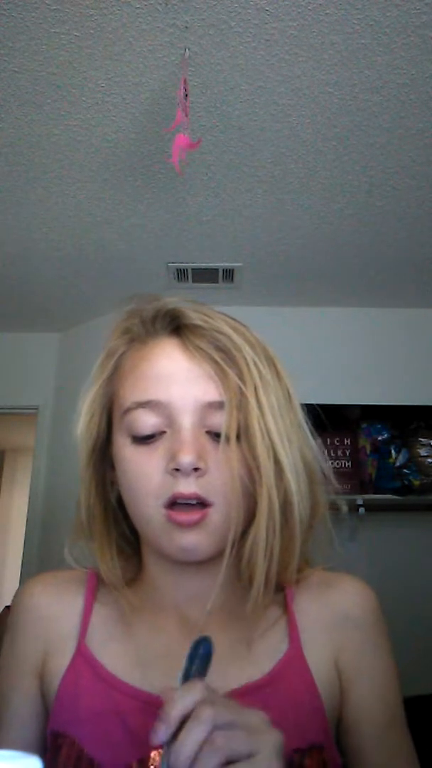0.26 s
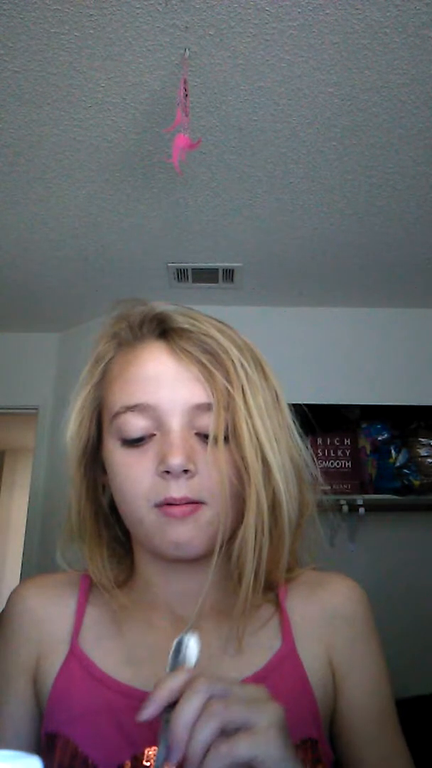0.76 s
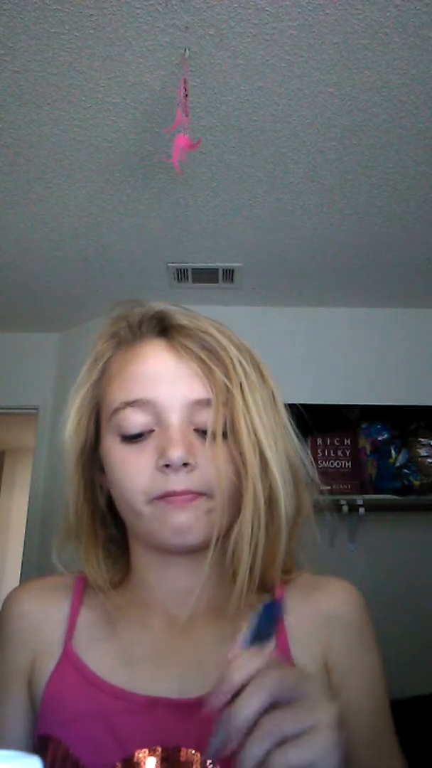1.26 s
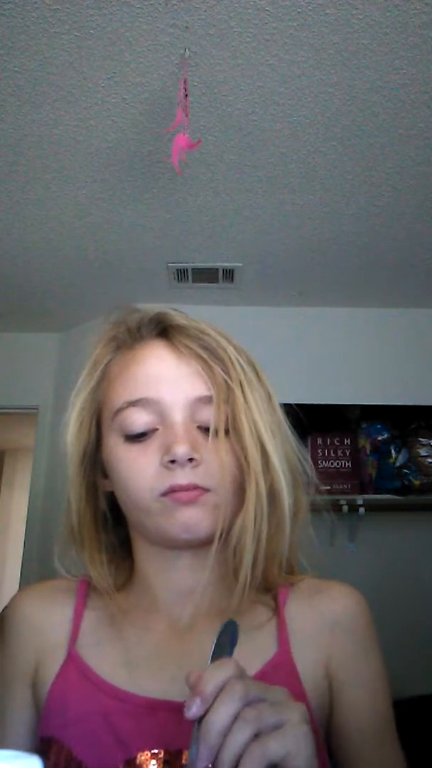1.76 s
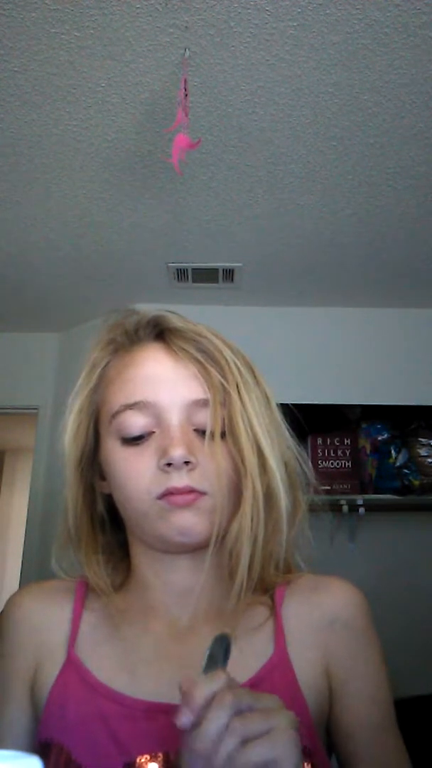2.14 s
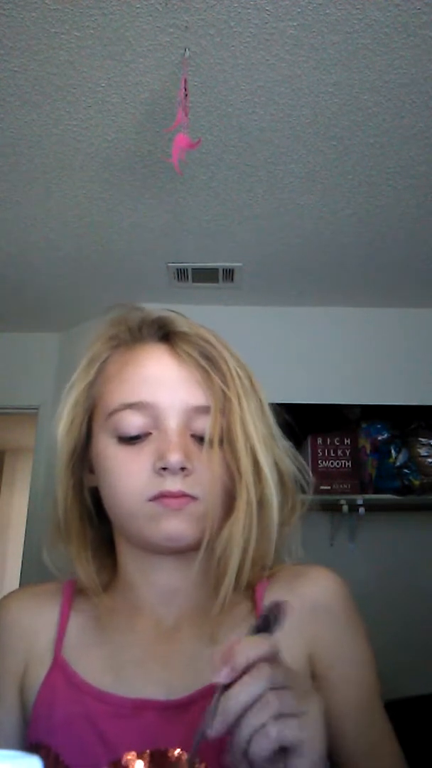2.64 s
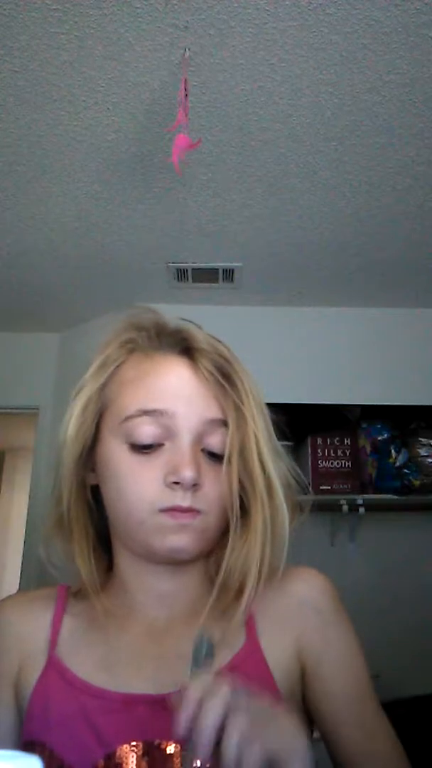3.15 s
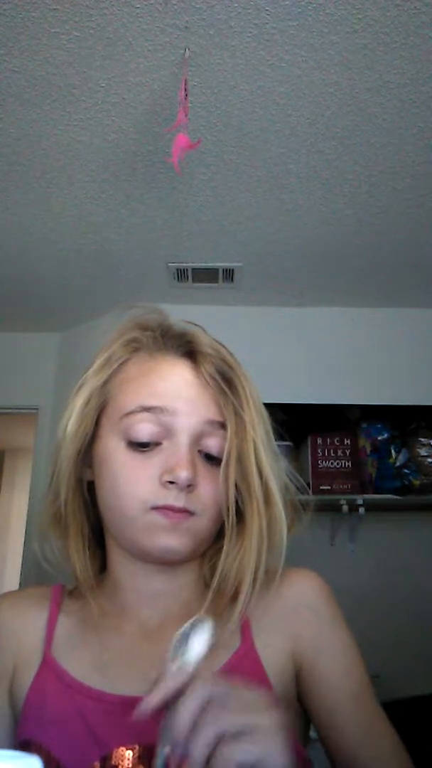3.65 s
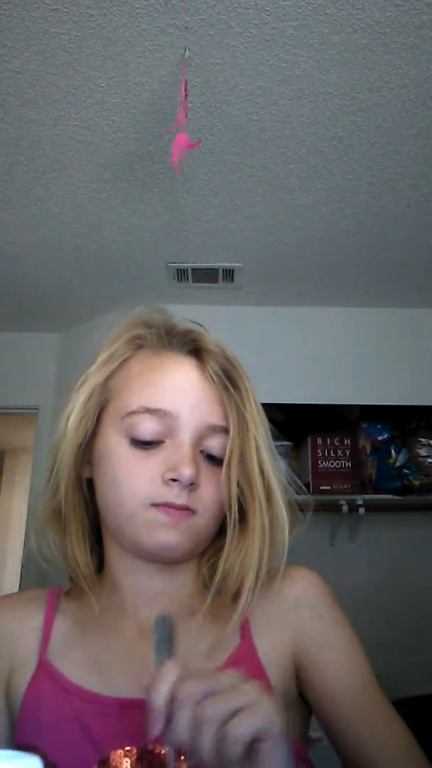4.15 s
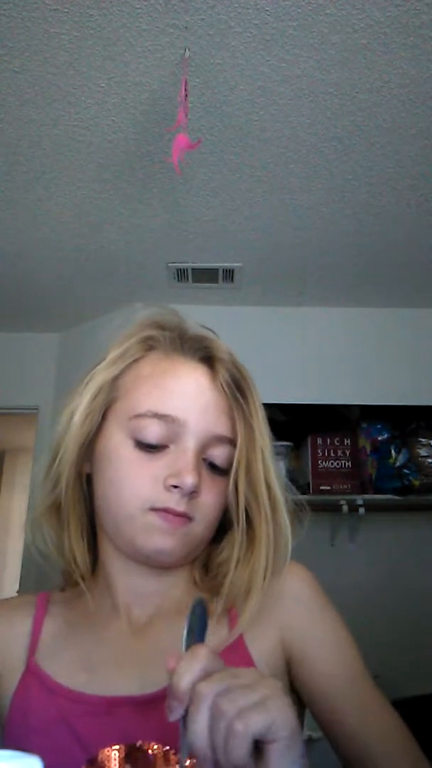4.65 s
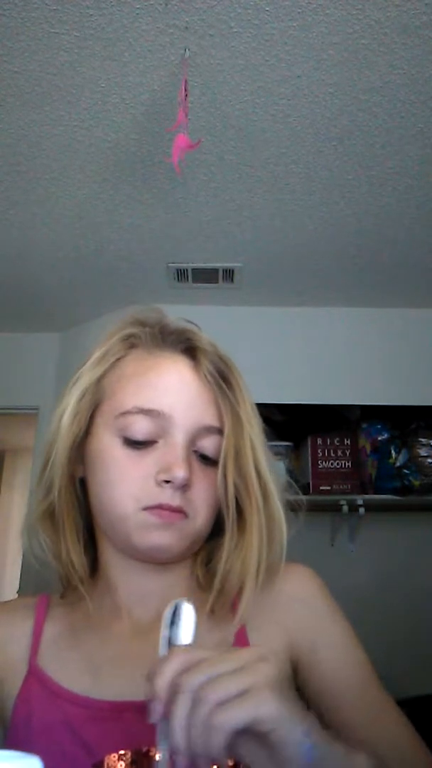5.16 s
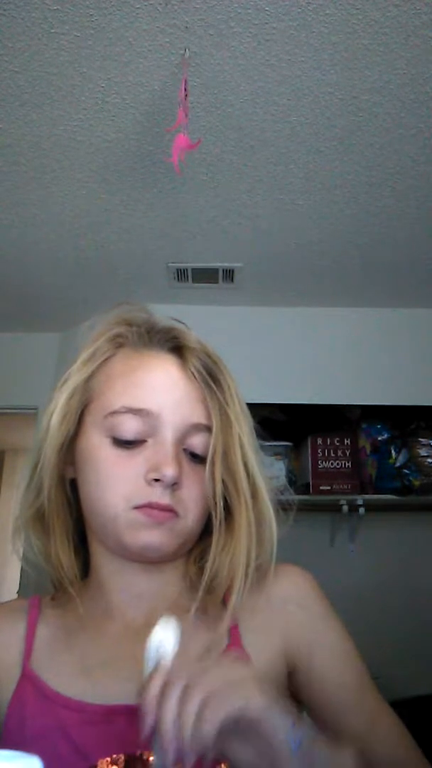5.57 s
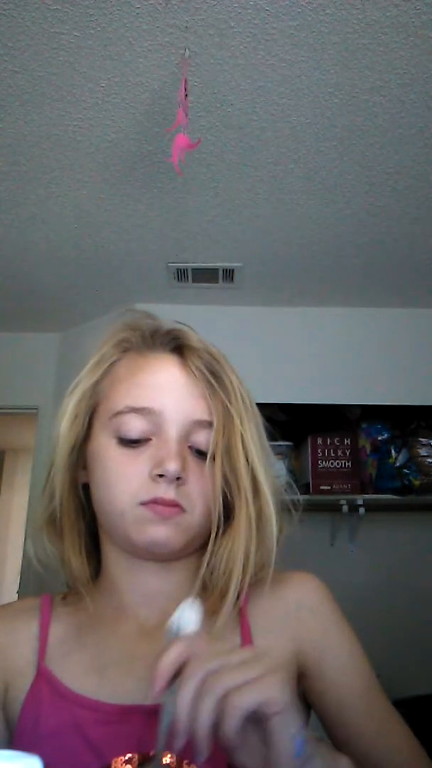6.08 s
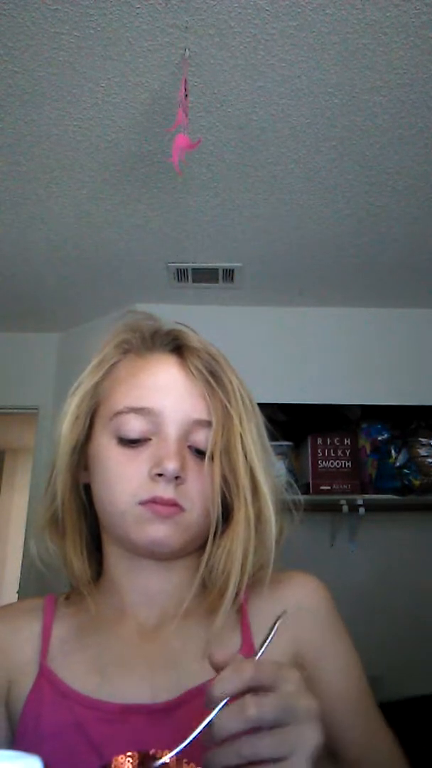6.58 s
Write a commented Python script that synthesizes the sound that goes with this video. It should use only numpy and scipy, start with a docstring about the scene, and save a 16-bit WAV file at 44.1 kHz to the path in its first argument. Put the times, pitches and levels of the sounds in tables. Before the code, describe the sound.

Irregular spoon taps on a slime-damped plastic cup: dull, woody mid-pitched tocks with a bright metallic tick on top, dying almost at once. Early taps are spaced, then busier and harder, followed by a softer passage of sticky, gritty dragging and a loud closing burst of knocks. Close stereo microphone with the cup nearer the left; the right is duller. Faint airy hiss and low hum of a small room.

```python
"""A metal spoon stirs sticky slime in a small plastic cup on a table, close to the left port of a two-port microphone.
Knocks on the cup are sums of fading tones plus a bright crack of shaped noise, with a short rough rattle after.
Dragging is grainy noise that swells with each stroke, with small popping tones; a few thin squeaks are pure tones.
Soft low bumps, many just after a knock, are short swelling tones. A small quiet room adds echoes,
and noise makes its air and faint hums."""
import sys
import numpy as np
from scipy import signal
from scipy.fft import rfft, irfft, next_fast_len
from scipy.io import wavfile
from scipy.ndimage import uniform_filter1d

SR = 44100
rng = np.random.default_rng(int(sys.argv[2]) if len(sys.argv) > 2 else 0)


def master_out(mix):
    """Clip the mix to full scale and print it as 16-bit PCM to the path in sys.argv[1]."""
    frames = np.transpose(np.atleast_2d(mix))
    ceiling = np.clip(frames, -1, 1)
    pcm = np.round(ceiling * 32767).astype(np.int16)
    wavfile.write(sys.argv[1], SR, pcm)


N = 300321  # length in samples

# All levels are those in the mix, before the overload in record().
# Still room air. Each row: pitch in Hz, relative level per hertz in dB.
AIR_SPECTRUM = [(15, -21), (30, -31), (60, -15.5), (110, -9), (200, -12.5), (300, -16), (600, -21.5),
                (1000, -23), (1400, -23), (2500, -23.5), (5000, -29.5), (9000, -30), (15600, -33.5),
                (16100, -47.5)]
# How alike the air is at both ports. Each row: pitch in Hz, likeness (1 is the same).
AIR_LIKENESS = [(60, 0.9), (240, 0.76), (950, -0.05), (3770, 0.014), (15000, 0.023)]
# How the air leans to one side. Each row: pitch in Hz, left minus right in dB.
AIR_BALANCE = [(60, -11.5), (180, -1.5), (550, -1.5), (1650, 6), (4970, 7), (15000, 5.5)]
# Wavering hums. Each row: pitch in Hz, width in Hz, level in dB.
ROOM_HUMS = [(38.3, 5, -73.5), (115.9, 15, -67)]
# Strokes through the slime. Each row: time of most pressure in seconds, rise in seconds, fall in seconds,
# rub level in dB, hiss level in dB, level of the rub's low body in dB.
SPOON_STROKES = [(.78, .04, 0.28, -66, -71, -66), (1.12, 0.072, .14, -55, -67, -47.5),
                 (1.353, 0.1, 0.06, -63.5, -65.5, -61), (1.64, 0.051, 0.054, -75, -62.5, -66),
                 (1.838, 0.021, 0.022, -69, -66, -66), (2.17, 0.046, 0.088, -78, -74, -71),
                 (2.39, 0.076, 0.07, -62, -78, -66), (2.5, 0.12, 0.017, -57, -51, -62),
                 (2.6, 0.073, 0.04, -75, -82, -68), (2.92, 0.098, 0.15, -58, -61.5, -58),
                 (3.062, 0.025, 0.029, -60, -65, -68), (3.19, 0.07, 0.069, -58.5, -55.5, -62),
                 (3.4, 0.063, 0.036, -65, -57.5, -63.5), (3.5, .05, 0.039, -58, -57.5, -62),
                 (3.934, 0.074, 0.056, -60.5, -65, -58.5), (4.16, 0.027, 0.14, -68, -65.5, -69),
                 (4.318, 0.078, 0.091, -56, -68.5, -52), (4.653, 0.091, 0.083, -53, -57.5, -59),
                 (4.97, .05, .05, -76.5, -81, -59.5), (5.15, 0.14, 0.17, -63.5, -66, -72),
                 (5.288, 0.031, 0.01, -67, -53, -71), (5.385, 0.05, 0.034, -51.5, -53, -53),
                 (5.601, 0.082, 0.075, -59, -58, -68), (5.73, 0.13, 0.066, -55.5, -68, -56),
                 (5.85, 0.065, 0.058, -59.5, -60, -73), (5.92, 0.067, 0.086, -54, -66, -59),
                 (6.04, 0.054, 0.041, -55.5, -69, -56), (6.42, 0.063, 0.075, -66, -87, -63),
                 (6.65, 0.075, .04, -59, -60, -64), (6.7, 0.036, .04, -56, -59, -56)]
# Colour of the rubbing. Each row: pitch in Hz, relative level per hertz in dB.
RUB_SPECTRUM = [(120, 1), (280, 1), (520, 0), (900, -4), (1350, 3), (1800, -1), (2300, -4), (2700, -5.5),
                (3100, -4), (4000, -9), (5000, -12.5), (7000, -20.5), (12000, -42)]
# Colour of the hiss. Each row: pitch in Hz, relative level per hertz in dB.
HISS_SPECTRUM = [(3000, -32.5), (6000, -10.5), (7500, -13), (9500, -3.5), (11000, -8.5), (13000, -17.5),
                 (15500, -20.5), (16200, -35)]
# Spoon knocks. Each row: start in seconds, peak level in dB of wall ring, table thud, bottom ring, rim clack
# and metallic crack, pitch in Hz that the struck spot favours in the wall, length factor of wall and bottom ring.
SPOON_KNOCKS = [(0.2243, -11.5, -20, -25.5, -17.5, -29, 1340, 0.78),
                (0.547, -19.5, -23.5, -34.5, -19, -17.5, 1560, 1),
                (0.763, -53, -51, -49.5, -44, -48, 930, 0.86), (1.0678, -39, -52, -52, -57, -53, 1600, 0.7),
                (1.2736, -37, -44, -51, -35.5, -58, 1410, 0.9),
                (1.348, -44, -57, -47, -61, -58, 1560, 0.67),
                (1.506, -4.5, -16.5, -19, -12.5, -17.5, 1340, 0.72),
                (1.5771, -28, -30, -37.5, -27, -32.5, 1560, 0.9),
                (1.7084, -21, -33.5, -36.5, -23.5, -29.5, 1490, 0.69),
                (1.959, -23.5, -33.5, -33.5, -26.5, -32, 1560, 0.39),
                (2.0147, -53, -69, -58, -48, -37, 1570, 0.98),
                (2.039, -21.5, -23.5, -22.5, -25.5, -26.5, 1780, 0.57),
                (2.095, -23.5, -36.5, -38.5, -29.5, -43, 1340, 0.71),
                (2.2502, -6, -41, -15.5, -10, -15.5, 1226, 0.47),
                (2.431, -61, -65, -65, -44, -41, 995, 0.96),
                (2.453, -14, -29.5, -26, -26.5, -35.5, 1390, 0.32),
                (2.6638, -18, -26, -27.5, -19, -25, 1230, 0.33),
                (2.707, -39, -70, -61, -57, -51, 1790, 0.7),
                (2.769, -19.5, -29.5, -30, -16, -22.5, 1350, 0.9),
                (2.7783, -4, -16, -20, -9.5, -8.5, 1390, 0.72),
                (2.949, -34, -32.5, -40, -59, -59, 1116, 0.66),
                (3.005, -27.5, -32.5, -34, -32, -38.5, 1540, 0.73),
                (3.1168, -24.5, -35, -36, -25.5, -36, 1360, 0.37),
                (3.183, -28, -27.5, -39, -44, -52, 1240, 0.59),
                (3.24, -63, -39.5, -54, -54, -53, 1810, 0.9), (3.41, -43, -52, -46, -49.5, -49, 1360, 0.83),
                (3.4224, -28.5, -33, -34, -33, -35.5, 1410, 0.95),
                (3.4425, -25, -23, -33, -23, -22.5, 1310, 1),
                (3.6438, -7.5, -23.5, -38, -8, -17.5, 1550, 0.8),
                (3.7453, -9.5, -14, -11.5, -11.5, -10, 1290, 0.75),
                (3.843, -23.5, -46, -41, -29, -35, 1560, 0.53), (3.8653, -43, -40, -44, -50, -42, 1310, 1),
                (4.0234, -14.5, -26, -40, -16, -12.5, 1360, 0.81),
                (4.1546, -47.5, -50, -58, -50.5, -44, 1730, 0.88),
                (4.307, -45, -40.5, -48.5, -65, -58.5, 1800, 1),
                (4.419, -53.5, -60, -66, -60, -46.5, 1270, 0.9),
                (4.5326, -38, -42, -48, -47, -50, 1260, 0.36),
                (4.661, -24.5, -31, -36, -31, -32, 1350, 0.38),
                (5.048, -46.5, -49, -52, -52, -48, 1560, 0.67), (5.107, -42, -63, -66, -41.5, -42, 1560, 1),
                (5.238, -51, -63, -66.5, -49.5, -40, 1350, 0.82),
                (5.513, -37, -34, -40.5, -60.5, -59, 1200, 0.61),
                (5.518, -33, -35.5, -57, -27.5, -27, 1800, 1),
                (5.65, -66, -57, -49, -39, -33.5, 1560, 0.35),
                (5.669, -28.5, -27, -31, -38.5, -53, 1330, 0.74),
                (5.796, -42.5, -73, -62, -50, -42, 1310, 1), (5.9019, -41, -53, -50, -42, -35.5, 1340, 1),
                (6.0046, -57, -69, -55, -35, -39.5, 1310, 0.9),
                (6.078, -42, -31, -36, -31, -45, 1500, 0.45),
                (6.083, -8, -23.5, -20, -13.5, -26.5, 1705, 0.57),
                (6.2057, -2.5, -15.5, -5.5, -10.5, -13.5, 1126, 0.25),
                (6.303, -16, -31, -33, -20, -29.5, 1240, 0.41),
                (6.3529, -12, -30.5, -36, -18, -17, 1474, 0.7),
                (6.5733, -11, -26, -31, -9, -7.5, 1423, 0.97),
                (6.669, -14.5, -27, -35, -18, -21, 1550, 0.81),
                (6.7378, -13.5, -15.5, -46, -17.5, -27, 1180, 0.39)]
# Each blow shifts pitches and levels in the next four tables; it scales times only for wall and bottom,
# while table and rim times have a fixed factor.
# Tones of the cup wall, damped by slime. Each row: pitch in Hz, level in dB, time to fall 60 dB in seconds.
WALL_TONES = [(1110, -6.5, 0.089), (1180, -28.5, 0.01), (1290, -11.5, 0.066), (1360, 13.5, 0.02),
              (1516, 10, 0.013), (1560, 0, 0.0088), (1552, 7, 0.02), (1737, 3.5, 0.022)]
# Tones of the table under the cup. Each row: pitch in Hz, level in dB, time to fall 60 dB in seconds.
TABLE_TONES = [(159, -6, 0.061), (253, -6.5, 0.17), (344, 5, 0.043), (394.4, -3, 0.043), (486, -0.5, 0.06),
               (521.4, 0, 0.051)]
# Tones of the cup bottom under the slime. Each row: pitch in Hz, level in dB, time to fall 60 dB in seconds.
BOTTOM_TONES = [(582, -4, 0.058), (691, -3.5, 0.045), (769, -7, 0.052), (847, -1, 0.067), (945, 1, 0.035),
                (954, -5.5, 0.019)]
# Tones of the rim, heard as a short clack. Each row: pitch in Hz, level in dB, time to fall 60 dB in seconds.
RIM_TONES = [(1995, 8.5, 0.01), (2216, -9, 0.025), (2368, 5, 0.015), (2683, 11, 0.0071),
             (3087, 7.5, 0.0077), (3275, 3.5, 0.014), (3760, -17.5, 0.015), (4355, 1.5, 0.01),
             (4970, -38, 0.0027), (5770, -3, 0.0061)]
# Crack of metal on plastic. Each row: pitch in Hz, relative level per hertz in dB.
CRACK_SPECTRUM = [(2000, -15.5), (4500, 5), (7200, -1), (9300, 4.5), (11000, -1.5), (13000, -7),
                  (16500, -24)]
# Soft low bumps near 114 Hz, many just after a knock.
# Each row: time of the peak in seconds, level in dB, half length in seconds.
LOW_THUMPS = [(0.239, -43.5, 0.0083), (1.537, -36.5, 0.013), (1.604, -42, 0.0049), (2.058, -45, 0.01),
              (2.802, -36.5, 0.0088), (3.205, -48.5, 0.011), (3.258, -40, 0.0083), (3.448, -35, 0.008),
              (3.471, -33.5, 0.0072), (3.764, -34, 0.0087), (4.688, -41, 0.0041), (5.074, -43, 0.0122),
              (5.538, -47.5, 0.0056), (5.7, -40, 0.008), (6.228, -36, 0.0068), (6.382, -45.5, 0.012),
              (6.765, -33, 0.0088)]
# Faint squeaks of spoon on wet plastic. Each row: start in seconds, peak in dB, pitch in Hz, length in seconds.
WET_SQUEAKS = [(.675, -58, 3820, 0.024), (0.742, -62, 3820, 0.019), (0.776, -62.5, 3220, 0.022),
               (4.183, -52.5, 2950, 0.018)]
# The far port is shaded from the cup. Each row: pitch in Hz, left minus right in dB.
PORT_SHADE = [(100, 5.5), (300, -1), (700, 4.5), (1400, 15), (3000, 17), (6000, 27), (10000, 34),
              (15000, 13)]
# The cup throws its treble upward, into the room. Each row: pitch in Hz, level in dB.
ROOM_SEND = [(100, -3.5), (500, 0), (1500, -2.5), (4000, -12), (10000, 5.5), (15000, -1.5), (16300, -12.5)]
# Echoes from walls and ceiling. Each row: delay in seconds, level in dB.
ROOM_ECHOES = [(.009, -20.5), (0.0158, -30), (0.016, -28.5)]
# How long the room's tail lasts. Each row: pitch in Hz, time to fall 60 dB in seconds.
ROOM_DECAY = [(125, 0.22), (500, 0.24), (1500, 0.24), (4000, 0.38), (10000, 0.17), (16000, 0.18)]

AIR_DB = -64
STROKE_ENDS_DB = -20.5  # level at the ends of rise and fall, against the peak
CREEP_RUB_DB, CREEP_HISS_DB = -75.5, -83.5  # the slime creeps on between strokes
BODY_HZ = 950  # under this pitch the rubbing is heard through cup bottom and table
POPS_DB, POPS_PER_S = -6, 90  # level against the rub, average count per second
TABLE_SPOT_HZ, RIM_SPOT_HZ = 428, 2715  # pitch favoured in table and rim
CRACK_T60_S = 0.009  # fading of the raw burst, too short to carry a pitch
BOUNCE_S, BOUNCE_DB = 0.002, -5  # the spoon's edge touches twice: typical gap, level of the second touch
RATTLE_DB, RATTLE_T60_S = -24.5, 0.14  # level against the wall ring, time to fall 60 dB
THUMP_HZ = 114  # middle of a small random range
LAG_S = 0.00041  # travel from near to far port
ROOM_DB, ROOM_LEAN = -8.5, 0.44  # tail level; share of the shading that the room sound feels
EDGE_HZ = 16700  # upper limit of the sound


def gain_of(db):
    """Turns decibels into amplitude."""
    return 10 ** (np.asarray(db) / 20)


def evened(x):
    """Scales a sound to an average (rms) level of 1."""
    return x / np.sqrt(np.mean(x ** 2) + 1e-20)


def read(points, hz):
    """Reads between the rows of a table, on a log pitch scale."""
    table_hz, value = np.transpose(points)
    return np.interp(np.log(hz + 1), np.log(table_hz + 1), value)


def add(mix, s, sound):
    """Mixes a sound in at time s, in seconds."""
    part = mix[round(s * SR):][:len(sound)]
    part += sound[:len(part)]


def coloured(x, response):
    """Filters a sound: each pitch is multiplied by response(pitch)."""
    size = next_fast_len(x.shape[-1])
    spectrum = rfft(x, size) * response(np.fft.rfftfreq(size, 1 / SR))
    return irfft(spectrum, size)[..., :x.shape[-1]]


def air():
    """Still room air is soft noise, partly alike at both ports; hums are narrow bands of noise."""
    left_noise, other_noise, hum_noise = rng.standard_normal((3, N))

    def likeness(hz):
        return np.clip(read(AIR_LIKENESS, hz), -1, 1)

    left = coloured(left_noise, lambda hz: gain_of(read(AIR_SPECTRUM, hz)))
    right = coloured(left_noise, likeness)
    right += coloured(other_noise, lambda hz: np.sqrt(1 - likeness(hz) ** 2))
    right = coloured(right, lambda hz: gain_of(read(AIR_SPECTRUM, hz) - read(AIR_BALANCE, hz)))
    hums = np.zeros(N)
    for hum_hz, width_hz, db in ROOM_HUMS:
        band = coloured(hum_noise, lambda hz: 1 / (1 + (2 * (hz - hum_hz) / width_hz) ** 2))
        hums += gain_of(db) * evened(band)
    return gain_of(AIR_DB) * evened(np.array([left, right])) + hums


def pressure(column, creep_db):
    """Loudness curve of one drag layer: each stroke swells and dies away, over a steady creep."""
    t, out = np.arange(N) / SR, np.full(N, gain_of(creep_db))
    for row in SPOON_STROKES:
        s, rise_s, fall_s = row[:3]
        near = slice(max(round((s - 0.5) * SR), 0), round((s + 0.5) * SR))
        late = t[near] - s
        distance = np.maximum(-late / rise_s, late / fall_s)  # 0 at the peak, 1 at the ends
        out[near] += gain_of(row[column] + STROKE_ENDS_DB * distance ** 0.88)
    return out


def patchy(x, patch_db, frames, bins):
    """Lifts and lowers random patches of time and pitch."""
    z = signal.stft(x, nperseg=256)[2]
    field = uniform_filter1d(rng.standard_normal(z.shape), bins, 0)
    field = uniform_filter1d(field, frames, 1)
    return evened(signal.istft(z * gain_of(patch_db * evened(field)), nperseg=256)[1][:N])


def slime_pops():
    """Where slime lets go, a small pop rings: a tone at one of 12 pitches that fades at once."""
    size = gain_of(0.47 * np.minimum(rng.exponential(1, N), 4))
    size = size * (rng.random(N) < POPS_PER_S / SR)  # most samples start no pop
    kind, t, pops = rng.integers(0, 12, N), np.arange(200) / SR, np.zeros(N)
    for k, hz in enumerate(np.geomspace(1300, 11000, 12)):
        pop = np.sin(2 * np.pi * hz * t) * np.exp(-hz * t / 1.7)
        pops += signal.oaconvolve(size * (kind == k), pop)[:N]
    return evened(pops)


def drag():
    """Stick and slip make grainy rubbing and hiss, which follow the strokes along with the pops."""
    rub = pressure(column=3, creep_db=CREEP_RUB_DB)
    hiss = pressure(column=4, creep_db=CREEP_HISS_DB)
    body = pressure(column=5, creep_db=CREEP_RUB_DB)

    def low(hz):
        return 1 / (1 + (hz / BODY_HZ) ** 6)

    def high(hz):
        return 1 - low(hz)

    grain = gain_of(1.9 * evened(uniform_filter1d(rng.standard_normal(N), 150)))  # stick and slip
    layers = ((RUB_SPECTRUM, low, body, 1.1),
              (RUB_SPECTRUM, high, rub, 1.2),
              (HISS_SPECTRUM, np.ones_like, hiss, 1.3))
    out = np.zeros(N)
    for spectrum, share, loudness, roughness in layers:
        noise = grain ** roughness * rng.standard_normal(N)
        noise = coloured(noise, lambda hz: share(hz) * gain_of(read(spectrum, hz)))
        out += loudness * patchy(noise, 4.5, frames=8, bins=4)  # wet and uneven
    return out + gain_of(POPS_DB) * rub * slime_pops()


def ring(modes, spot_hz, luck, stretch, rise_s, focus_db, reach_db):
    """One blow on a set of fading tones, peak 1; those near the struck spot's pitch speak most."""
    hz, db, t60 = np.transpose(modes)[:, :, None]
    strength, detune = luck.reshape(2, -1, 1)[:, :len(modes)]
    t = np.arange(5000) / SR
    # focus_db is the loss per octave away from the spot's pitch, reach_db the most that is lost
    db = db - np.minimum(focus_db * abs(np.log2(hz / spot_hz)), reach_db)
    db, hz = db + 2.5 * strength, hz * (1 + 0.035 * detune)  # grip and slime change every blow
    tones = gain_of(db - 60 * t / (t60 * stretch)) * np.sin(2 * np.pi * hz * t)
    sound = tones.sum(0) * (1 - np.exp(-t / rise_s))
    return sound / abs(sound).max()


def metal_crack(burst, crack_db):
    """Metal on plastic clicks with no pitch; a louder crack is brighter, with the same length. Peak 1."""
    t = np.arange(len(burst)) / SR
    tilt_db = 0.051 * (crack_db + 27.0)  # per octave
    spectrum = rfft(burst * gain_of(-60 * t / CRACK_T60_S))
    click = irfft(spectrum / abs(spectrum))  # an even spectrum, with no pitch
    click = click * gain_of(-30 * t / CRACK_T60_S)
    crack = coloured(click, lambda hz: gain_of(read(CRACK_SPECTRUM, hz) + tilt_db * np.log2((hz + 1) / 9000)))
    crack = np.roll(crack, 16)[:600]  # the filter's short lead-in belongs before the click
    return crack / abs(crack).max()


def knocks():
    """Each knock rings wall and bottom, thuds the table, clacks the rim and cracks in the treble."""
    out = np.zeros(N)
    luck = rng.standard_normal((len(SPOON_KNOCKS), 4, 20))
    noise = rng.standard_normal((len(SPOON_KNOCKS), 1024))
    for row, blow_luck, burst in zip(SPOON_KNOCKS, luck, noise):
        s, wall_db, thud_db, bottom_db, rim_db, crack_db, wall_hz, stretch = row
        wall_luck, table_luck, rim_luck, bottom_luck = blow_luck
        add(out, s, gain_of(wall_db) * ring(WALL_TONES, wall_hz, wall_luck, stretch, 0.001, 39, 16.0))
        add(out, s, gain_of(thud_db) * ring(TABLE_TONES, TABLE_SPOT_HZ, table_luck, 0.88, 0.0011, 9, 2.4))
        add(out, s, gain_of(bottom_db) * ring(BOTTOM_TONES, wall_hz, bottom_luck, stretch, 0.0012, 0, 0))
        add(out, s, gain_of(rim_db) * ring(RIM_TONES, RIM_SPOT_HZ, rim_luck, 0.71, 0.00092, 11, 3.1))
        crack = metal_crack(burst, crack_db)
        bounce_s = BOUNCE_S * gain_of(2 * wall_luck[-1])  # a spare random number varies the gap
        for late_s, db in ((0, 0), (bounce_s, BOUNCE_DB)):
            add(out, s + late_s - 16 / SR, gain_of(crack_db + db) * crack)
    no_bass = signal.butter(2, 150, "high", fs=SR, output="sos")  # a small cup moves no deep bass
    return signal.sosfilt(no_bass, out)


def rattle():
    """The spoon rattles on after each knock: a rough, dying burst in a brighter colour of the rubbing."""
    blows, t = np.zeros(N), np.arange(8000) / SR
    for row in SPOON_KNOCKS:
        s, wall_db = row[:2]
        fade = gain_of(wall_db + RATTLE_DB - 60 * t / RATTLE_T60_S)
        add(blows, s, fade * (1 - np.exp(-t / 0.0014)))
    bumps = gain_of(1.66 * evened(uniform_filter1d(rng.standard_normal(N), 60)))
    noise = bumps * rng.standard_normal(N)
    noise = coloured(noise, lambda hz: gain_of(read(RUB_SPECTRUM, hz) + 1.24 * np.log2((hz + 1) / 1000)))
    return blows * evened(noise)


def thumps():
    """Soft low bumps: tones of a few cycles that swell and fade, with the same shape at both ports."""
    out, t = np.zeros(N), np.arange(8000) / SR
    for (s, db, half_s), (phase, luck) in zip(LOW_THUMPS, rng.random((len(LOW_THUMPS), 2))):
        swell = t / half_s * np.exp(1 - t / half_s)
        hz = THUMP_HZ * (1 + 0.3 * (luck - 0.5))
        add(out, s - half_s, gain_of(db) * swell ** 2 * np.sin(2 * np.pi * (hz * t + phase)))
    no_bass = signal.butter(2, 75, "high", fs=SR, output="sos")  # thins the deepest bass
    return signal.sosfilt(no_bass, out)


def squeaks():
    """Spoon on wet plastic: short thin tones that swell and fade."""
    out = np.zeros(N)
    for s, db, hz, length_s in WET_SQUEAKS:
        t = np.arange(0, length_s, 1 / SR)
        add(out, s, gain_of(db) * np.sin(np.pi * t / length_s) * np.sin(2 * np.pi * hz * t))
    return out


def ports(left, right, share):
    """The far (right) port hears later and, in the treble, weaker."""
    def far_path(hz):
        return gain_of(-share * read(PORT_SHADE, hz)) * np.exp(-2j * np.pi * hz * LAG_S)

    return np.array([left, coloured(right, far_path)])


def tail():
    """A few single echoes over sparse random taps that fade at each pitch's own speed, one set per port."""
    size = SR // 2
    taps = np.zeros((2, size))
    at = np.arange(60, size - 20, 20)
    at = at + rng.integers(0, 20, (2, len(at)))
    np.put_along_axis(taps, at, rng.choice([-1., 1.], at.shape), 1)
    taps[1] = 0.4 * taps[0] + 0.9 * taps[1]  # the ports hear the tail only partly alike
    hz, t, z = signal.stft(taps, SR, nperseg=256)
    fade = gain_of(-60 * t / read(ROOM_DECAY, hz)[:, None])
    out = signal.istft(z * fade, SR, nperseg=256)[1][:, :size]
    out *= gain_of(ROOM_DB) / np.linalg.norm(out[0])
    for s, db in ROOM_ECHOES:
        out[:, round(s * SR)] += gain_of(db)
    return out


def room(x):
    """The hand moves the cup, so the room answers from slowly changing places: three blended tails."""
    sent = coloured(x, lambda hz: gain_of(read(ROOM_SEND, hz)))
    turn = 2 * np.pi * 1.3 * np.arange(N) / SR
    wet = np.zeros((2, N))
    for k in range(3):
        share = abs(np.sqrt(2 / 3) * np.cos(turn + k * np.pi / 3))
        wet += signal.oaconvolve((sent * share)[None], tail(), axes=1)[:, :N]
    return ports(*wet, ROOM_LEAN)


def scene():
    """Cup and slime, direct and through the room, with the thumps and the room air."""
    cup = knocks() + rattle() + drag() + squeaks()
    direct = ports(cup, cup, 1)
    bumps = thumps() * gain_of([[-1.5], [1.5]])  # a little stronger on the right
    return direct + room(cup) + bumps + air()


def record(dry):
    """Soft overload rounds off the hardest knocks, then a filter removes the highest treble."""
    rounded = np.tanh(dry / 1.348) * 1.682
    band_limit = signal.firwin(511, EDGE_HZ, window=("kaiser", 9), fs=SR)
    return signal.oaconvolve(rounded, band_limit[None], "same")


dry = scene()
out = record(dry)
master_out(out)
```